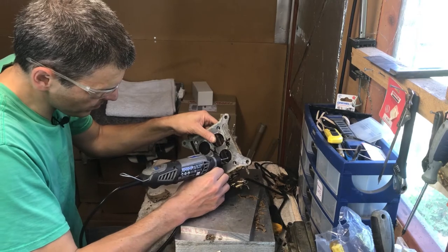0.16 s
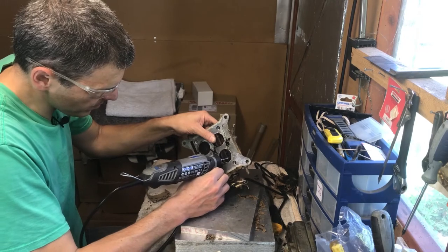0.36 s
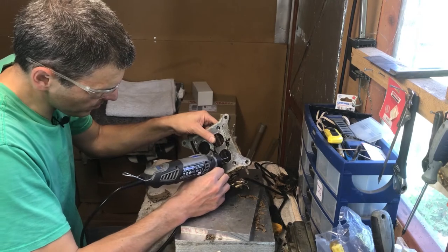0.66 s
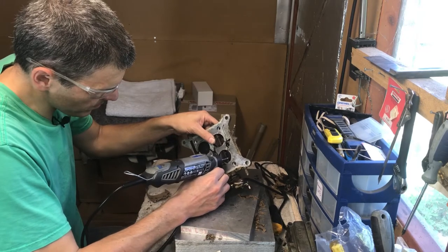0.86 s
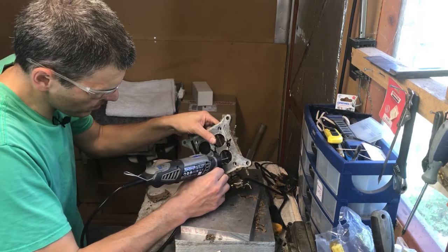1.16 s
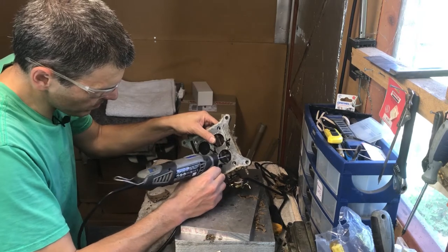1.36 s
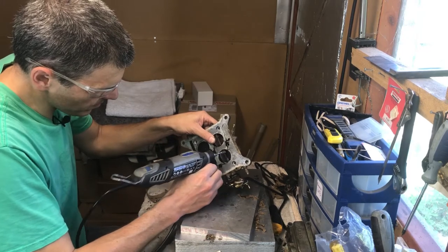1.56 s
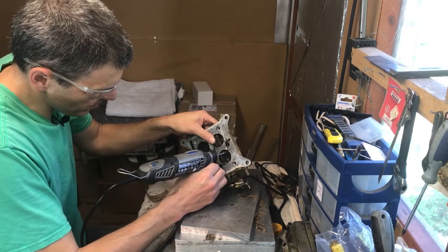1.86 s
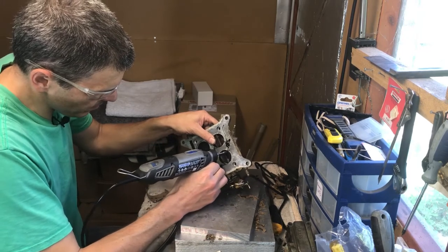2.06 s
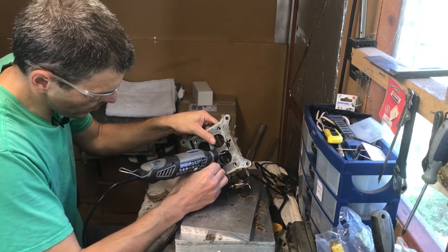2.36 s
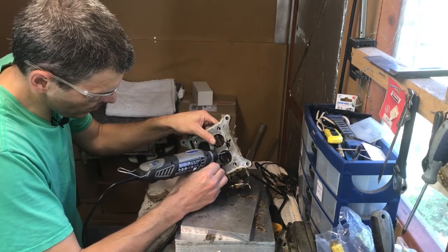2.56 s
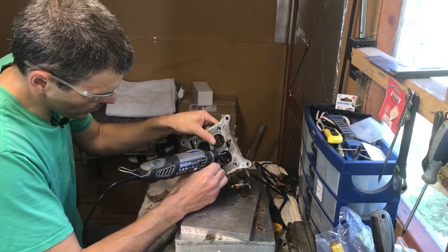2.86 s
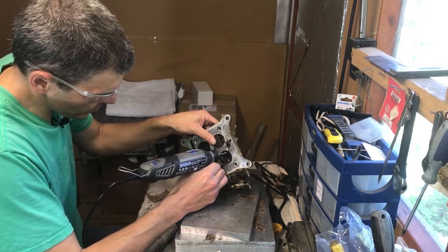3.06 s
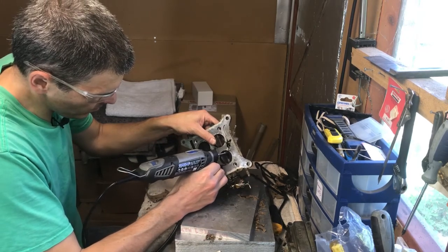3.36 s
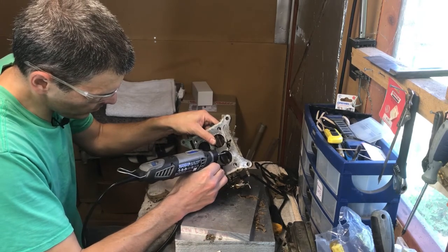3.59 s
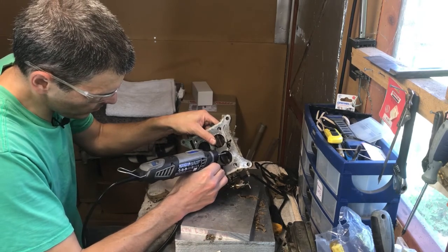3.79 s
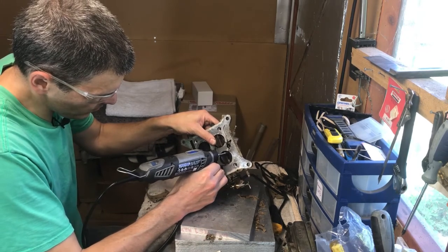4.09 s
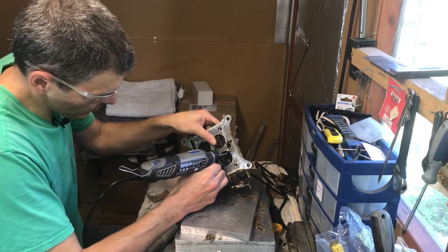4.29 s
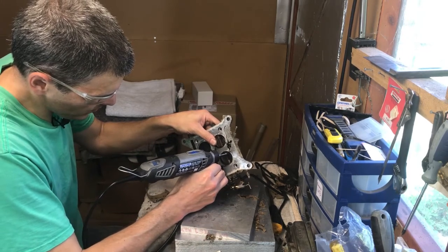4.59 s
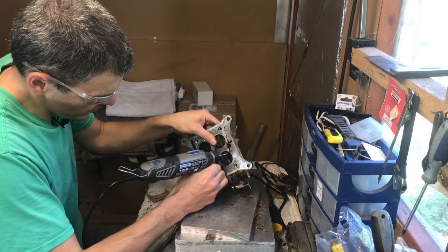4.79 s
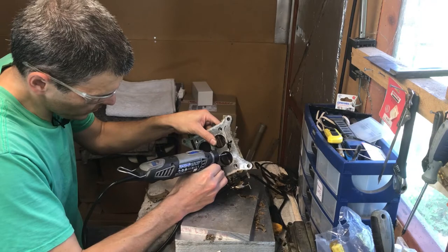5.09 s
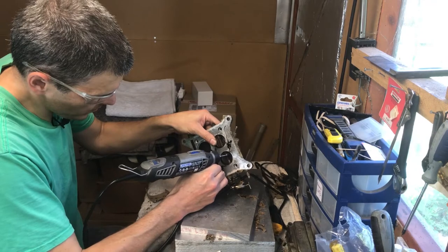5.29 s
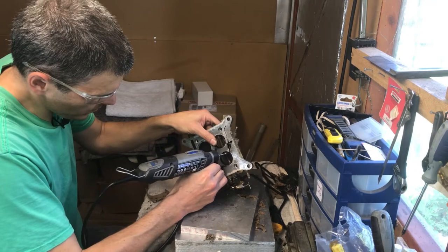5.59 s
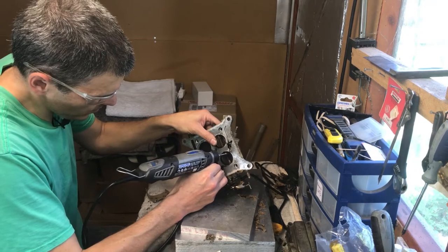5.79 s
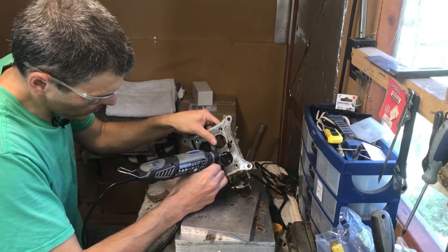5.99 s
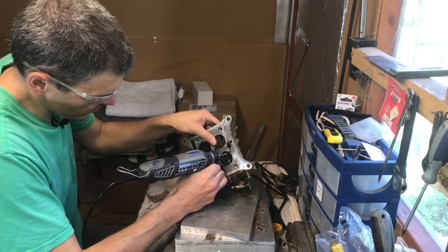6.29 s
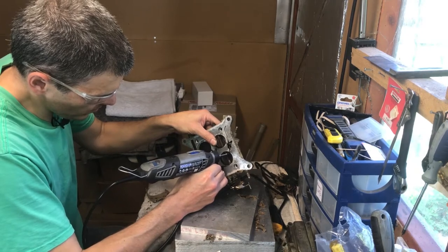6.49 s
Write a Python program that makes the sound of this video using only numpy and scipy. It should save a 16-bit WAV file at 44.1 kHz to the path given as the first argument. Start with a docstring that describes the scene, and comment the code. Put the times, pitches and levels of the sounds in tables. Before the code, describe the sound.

A corded rotary tool whines at high speed while its cutting tip grinds a metal part in short, rasping strokes.

```python
"""A corded rotary tool grinds a cast metal housing on a workbench, heard in mono from close by.
From the start its motor whines at about 23,000 rpm over a rush of cooling air. Each stroke slows it,
and the burr (the cutting tip) bounces some sixty times a second, tearing off grit that rings the metal.
Just after 1 s the burr is lifted and the motor recovers. From 2 s it sweeps to and fro on a new spot,
about four strokes a second and ever harder. Around 5 s the hand leans in and the bench thuds more."""
import sys
import numpy as np
from scipy import signal
from scipy.fft import rfft, irfft
from scipy.io import wavfile
from scipy.ndimage import uniform_filter1d

SR = 44100
rng = np.random.default_rng(int(sys.argv[2]) if len(sys.argv) > 2 else 0)


def file_out(sig):
    """Save sig as 16-bit WAV at sys.argv[1]."""
    # one column per channel
    cols = np.atleast_2d(sig).T
    # limit, then scale
    lim = np.clip(cols, -1, 1)
    pcm = np.round(lim * 32767).astype(np.int16)
    wavfile.write(sys.argv[1], SR, pcm)


N = 293265
TIME = np.arange(N) / SR
FREQ = np.arange(N // 2 + 1) * SR / N

# The three main motor tones as the tool is tilted: time_s, fan_db, octave_below_whine_db, whine_db
MOTOR_LEVELS = [(0, -36, -46, -39), (1.0, -39.5, -38, -31), (1.2, -40, -59, -31), (1.42, -36, -53, -26.5),
                (1.6, -35, -43, -34.5), (1.72, -58, -36, -32.5), (1.95, -50, -40, -31),
                (2.2, -35, -43.5, -30), (4.7, -43, -41, -30), (5.35, -34.5, -51, -30.5),
                (5.8, -48, -33.5, -25), (6.65, -39, -55, -35)]
# Weaker overtones of the spinning shaft: times_shaft_speed, level_db
SHAFT_OVERTONES = [(5, -47.5), (7, -49.5), (9, -79), (15, -43), (16, -38), (23, -36), (25, -38.5),
                   (36, -58)]
# Bearing tones, which lie between the overtones: times_shaft_speed
BEARING_TONES = [4.083, 5.083, 9.17]
# Tone colour of the cooling air and the motor's brushes: pitch_hz, level_db
AIR_COLOUR = [(110, -19.5), (520, -18.5), (620, -6), (950, -5), (1150, -8), (1500, -6), (3000, 0),
              (6000, 0), (8000, 0.5), (9700, 0.5), (10400, -6.5), (11300, 0.5), (13000, -1), (15700, -1.5)]
# Tone colour of the workshop's rumble: pitch_hz, level_db
RUMBLE_COLOUR = [(20, -4), (48, -8), (75, 7.5), (120, -9.5), (170, -1.5), (400, -21), (900, -66)]
# Strokes of the burr: middle_s, length_s, level_db, shaft_drag_hz, bounce_rate_hz, bounce_depth_0_to_1
BURR_STROKES = [(0.024, 0.2, -22, 18.5, 62.4, .6), (0.282, .24, -21, 10.2, 47.6, 0.67),
                (0.494, 0.18, -20.5, 11, 48.6, .8), (0.817, .21, -28.5, 6.7, 55, 0.9),
                (1.003, 0.1703, -23.5, 1.53, 57, 0.99), (1.131, .17, -55, 5.4, 48.4, .8),
                (1.982, 0.075, -27.5, 1.09, 57.8, 0.26), (2.125, 0.21, -22, 8, 57.9, 0.24),
                (2.28, .14, -26.5, 3.8, 53.3, 0.62), (2.604, .21, -21.5, 8.4, 69.98, 0.4),
                (2.901, .33, -21.5, 10, 56, 0.7), (3.237, 0.28, -21.5, 9.7, 53.05, 0.67),
                (3.594, .29, -21, 10.3, 62.24, 0.48), (3.873, .24, -19.5, 12.8, 64, 0.54),
                (4.145, .28, -20, 10.8, 55.1, 0.4), (4.397, .29, -18, 19.6, 57.93, 0.51),
                (4.701, 0.25, -18, 14.5, 55.1, 0.54), (4.955, .18, -19, 19, 70.1, 0.53),
                (5.199, .24, -18.5, 19, 76.23, 0.81), (5.441, .2, -20.5, 25, 60, 0.34),
                (5.66, .14, -16.5, 4.7, 67.8, .6), (5.863, 0.25, -19, 14.4, 55.84, 0.46),
                (6.109, .17, -18, 17.6, 57, 0.45), (6.354, 0.21, -18.5, 18.9, 59.97, .55),
                (6.602, .13, -19, 16.6, 51.96, 0.37)]
# Tone colour of the bare scrape: pitch_hz, first_spot_db, second_spot_db
SCRAPE_COLOUR = [(230, -25, -32.5), (535, -24.5, -29.5), (590, -16.5, -22.5), (1280, -14.5, -16),
                 (2340, -3.5, -5), (3350, -9.5, -5.5), (5670, -1, -3.5), (8800, -3, -2),
                 (10500, -10.5, -10), (11330, -1.5, -4), (13400, -13, -17), (16050, -12, -1.5)]
# Ringing notes of the metal, relative to the scrape: pitch_hz, half_width_hz, first_spot_db, second_spot_db
METAL_NOTES = [(304.6, 21, 18.5, 22), (420, 43, 10, 16), (601, 11, 9, 9.5), (994, 40, 16.5, 19),
               (1128, 22, 12, 15), (1486, 58, 11.5, 7.5), (2187, 17, 4, 7), (2370, 55, 5, 7.5),
               (2586, 48, 6.5, 9), (3145, 33, 9.5, -4), (4375, 8.9, 4, 17), (4580, 13, 16.5, -6),
               (4830, 68, 2, 3), (5185, 118, 9, 8), (5287, 91, -6, 10.5), (5443, 38, 0, 11.5),
               (5670, 29, 2, 10.5), (5980, 53, 6, 9.5), (6290, 66, 3, 5.5), (7066, 102, -16, 10.5),
               (7970, 35, -1, 8), (8376, 45, 9, 7.5), (8570, 73, 11.5, -12), (9130, 20, 2, 16),
               (12070, 60.3, -7, 12), (13400, 110, 11, -2), (14280, 47, 1, 12.5), (14750, 83, -4, 12)]
# Brief dips in the hiss, while the main tones carry on: middle_s, length_s, depth_db
HISS_DIPS = [(0.052, 0.012, -5), (.136, .014, -2.5), (0.748, 0.032, -29), (0.904, 0.014, -4),
             (1.244, 0.008, -11), (1.938, 0.028, -37), (2.271, 0.014, -25), (2.436, 0.016, -27),
             (3.381, 0.016, -27), (3.869, 0.016, -34), (4.319, 0.024, -9), (4.509, 0.015, -18),
             (4.766, 0.014, -14.5), (5.171, 0.014, -20), (5.676, 0.036, -21), (5.814, .011, -32),
             (5.92, 0.014, -3)]
# Moments when the burr catches hard on the metal: time_s, relative_peak_db
HARD_CATCHES = [(0.2363, 0), (0.2588, -2), (0.2942, -1), (0.3147, 2.5), (0.3403, 2), (0.4308, 0.5),
                (0.452, -1.5), (0.4735, 2), (0.493, -2), (0.512, 1), (0.6478, -5), (2.8785, 0),
                (2.8963, 1.5), (3.2651, 1), (4.2752, 0), (4.354, 2.5), (4.9186, 2.5), (4.9341, 4.5),
                (4.9626, 1), (5.1399, 1.5), (5.1952, 2.5), (5.6098, 1.5), (5.7152, 1), (5.7884, -1)]

FREE_SHAFT_HZ, MAINS_HZ = 391, 50  # shaft turns a second with no load; the power supply
FULL_LOAD_DB = -21.5  # an ordinary stroke, which counts as load 1
SPOT_CHANGE_S = 1.5
LEAN_MIDDLE_S, LEAN_LENGTH_S = 5.22, 1  # the hand leans harder on the metal
TOP_HZ = 15750  # treble limit


def undb(db):
    """Turn decibels into a gain."""
    return 10 ** (np.asarray(db) / 20)


def unit(x):
    """Scale a signal to an average (rms) level of 1."""
    return x / np.sqrt(np.mean(x ** 2))


def spectra(table):
    """Turn each level column of a tone colour table into a gain for every frequency."""
    hz, *columns = np.transpose(table)
    return [undb(np.interp(np.log(FREQ + 1), np.log(hz), db)) for db in columns]


def colour(x, gain):
    """Filter a sound by the given gains so that peaks ring after a blow, never before it."""
    cepstrum = irfft(np.log(gain + 1e-9), N)
    cepstrum[1:N // 2] *= 2
    cepstrum[N // 2:] = 0
    return irfft(rfft(x) * np.exp(rfft(cepstrum)), N)


def wander(rate_hz):
    """A smooth random curve of size about 1 that changes about rate_hz times a second."""
    hold = max(int(SR / rate_hz), 2)
    steps = np.repeat(rng.standard_normal(N // hold + 1), hold)
    return unit(uniform_filter1d(uniform_filter1d(steps, hold), hold)[:N])


def ripple(spacing_hz, depth_db):
    """Small peaks and notches in tone colour, from crowded weak resonances and nearby surfaces."""
    heights = rng.standard_normal(4096)
    return undb(depth_db * np.interp(FREQ / spacing_hz, np.arange(len(heights)), heights))


def resonance(hz, half_width_hz):
    """Power gain of two resonances close together: one peak with steep sides."""
    return 1 / (1 + ((FREQ - hz) / half_width_hz) ** 2) ** 2


def push(middle_s, length_s):
    """A smooth push of the hand: 1 at its middle, 0 well outside its length."""
    return np.exp(-np.abs(2 * (TIME - middle_s) / length_s) ** 2.9)


def tone(turns, db, waver_db, smear):
    """One tone whose level and phase (smear, in radians) waver as the hands move the tool."""
    level = undb(db + waver_db * wander(9))
    return np.sqrt(2) * level * np.sin(2 * np.pi * turns + smear * wander(45))


def motor(load, slowdown_hz):
    """The shaft hums, its 8-blade fan sings and its 24 turning contacts (the commutator) whine."""
    wobble = (0.000487 + 0.001212 * load) * wander(16)
    shaft = np.cumsum((FREE_SHAFT_HZ - slowdown_hz) * (1 + wobble)) / SR  # turns so far
    fan, commutator, mains_pulses = 8 * shaft, 24 * shaft, 2 * MAINS_HZ * TIME
    time_s, *levels = np.transpose(MOTOR_LEVELS)
    fan_db, octave_below_db, whine_db = [np.interp(TIME, time_s, db) for db in levels]
    # the hum fades as the motor slows and as the hand leans in
    hum_db = -45.5 - 0.45 * slowdown_hz - 3.5 * push(LEAN_MIDDLE_S, LEAN_LENGTH_S)
    main = tone(shaft, hum_db, waver_db=1.95, smear=0.068)
    main += tone(fan, fan_db, waver_db=1.5, smear=0.073)
    # the biting burr jolts the shaft, which roughens the highest tones
    main += tone(commutator / 2, octave_below_db, waver_db=1.5, smear=0.2 + 0.5 * load)
    main += tone(commutator, whine_db - 2 * load, waver_db=2, smear=0.4 + 0.9 * load)
    weak = 0
    for multiple, db in SHAFT_OVERTONES:
        weak += tone(multiple * shaft, db, waver_db=2, smear=0.4 + 0.5 * load)
    for multiple in BEARING_TONES:
        weak += tone(multiple * shaft, db=-52, waver_db=2, smear=0.15)
    # the mains drives the motor in pulses, adding a row of tones below the fan's
    for step, db in enumerate([-45, -44, -44], start=1):
        main += tone(fan - step * mains_pulses, db, waver_db=2.5, smear=0.5)
    coil_hum = tone(2 * mains_pulses, db=-60.5, waver_db=2.1, smear=0.05)
    return main, weak + coil_hum


def cooling_air():
    """Air rushes evenly through the vents, with a hollow note from the work corner."""
    hollow = np.sqrt(1 + undb(12) ** 2 * resonance(hz=288.6, half_width_hz=14))
    gain = spectra(AIR_COLOUR)[0] * hollow * ripple(spacing_hz=71.8, depth_db=0.5)
    return undb(-25 + 0.25 * wander(5)) * unit(colour(rng.standard_normal(N), gain))


def workshop_rumble():
    """The room rumbles, low and faint."""
    rumble = colour(rng.standard_normal(N), spectra(RUMBLE_COLOUR)[0])
    return undb(-60 + 2 * wander(6)) * unit(rumble)


def strokes():
    """Each stroke makes the burr bite and bounce, and drags down the motor, whose speed follows late."""
    middle_s, length_s, db, drag_hz, bounce_hz, depth = np.transpose(BURR_STROKES)
    pushes = push(middle_s[:, None], length_s[:, None])
    lag_s, start_slowdown_hz = 0.154, 8.4
    memory = np.exp(-1 / (lag_s * SR))
    slowdown_hz = signal.lfilter([1 - memory], [1, -memory], drag_hz @ pushes)
    slowdown_hz += start_slowdown_hz * np.exp(-TIME / lag_s)
    bite = np.hypot(undb(db) @ pushes, undb(-40))  # a faint rub remains between strokes
    return bite, slowdown_hz, np.interp(TIME, middle_s, bounce_hz), np.interp(TIME, middle_s, depth)


def burr_force(bite, bounce_hz, depth):
    """The burr presses on the metal with steady rubbing, uneven bounces and a few hard catches."""
    cycle = np.cumsum(bounce_hz * (1 + 0.046 * wander(30))) / SR
    size_db = 1.07 * np.clip(rng.standard_normal(1024), -2, 2)
    shape = np.sin(np.pi * (cycle % 1) ** 0.72) ** 1.84  # digs in quickly, lets go more slowly
    catches, thrown_clear = hard_catches()
    bounces = unit(undb(size_db)[cycle.astype(int)] * shape) * (1 - thrown_clear)
    return np.hypot(bite * unit(1 - depth + depth * bounces), catches)


def knocks(force):
    """Sharpen the peaks of the force but keep its power: these blows set the metal ringing."""
    peaks = force ** 2.4
    power, peak_power = (uniform_filter1d(x ** 2, size=900) for x in (force, peaks))
    return peaks * np.sqrt(np.abs(power) / (np.abs(peak_power) + 1e-18))


def grit(spread_db):
    """A dense spray of chips of uneven size, each a tiny burst of noise."""
    chips = np.repeat(rng.standard_normal(N // 8 + 1), 8)[:N]
    return unit(rng.standard_normal(N) * undb(spread_db * np.clip(chips, -2.5, 2.5)))


def grinding(force):
    """Chips scrape the metal and make it ring; each of the two spots favours its own notes."""
    hz, half_width_hz, *note_db = np.transpose(METAL_NOTES)
    peaks = resonance(hz[:, None], half_width_hz[:, None])
    coarse, fine = ripple(spacing_hz=29.96, depth_db=3.5), ripple(spacing_hz=18, depth_db=2.28)
    blows = knocks(force)
    spots = [TIME < SPOT_CHANGE_S, TIME >= SPOT_CHANGE_S]
    scrape, ring = 0, 0
    for on_spot, bare_scrape, db in zip(spots, spectra(SCRAPE_COLOUR), note_db):
        # notes above about 9.5 dB ring at every bounce; weaker ones only colour the scrape
        strong = 1 / (1 + np.exp(2 * (9.5 - db)))
        power = undb(db) ** 2
        rubbing = bare_scrape * coarse * np.sqrt(1 + (power * (1 - strong)) @ peaks)
        ringing = bare_scrape * fine * np.sqrt((power * strong) @ peaks)
        total = np.sqrt(np.mean(rubbing ** 2 + ringing ** 2, where=FREQ < TOP_HZ) * 2 * TOP_HZ / SR)
        scrape += colour(on_spot * force * grit(spread_db=3.5), rubbing / total)
        ring += colour(on_spot * blows * grit(spread_db=0.5), ringing / total)
    return undb(1) * scrape, undb(2) * ring


def burr_drift(scrape, below_hz, swing_db):
    """As the burr drifts over the metal, the low part of the scrape swells and fades."""
    low = signal.sosfilt(signal.butter(1, below_hz, fs=SR, output="sos"), scrape)
    return scrape + low * (undb(swing_db * wander(11)) - 1)


def bench_thud(force):
    """The bounces thud faintly through the bench, louder while the hand leans in."""
    bass_band = signal.butter(1, [55, 110], "band", fs=SR, output="sos")
    thud = signal.sosfilt(bass_band, force * (1 + 0.5 * wander(110)))
    return undb(-64.5 + 12 * push(LEAN_MIDDLE_S, LEAN_LENGTH_S)) * unit(thud)


def hiss_dips():
    """The hiss drops away for an instant now and then: a gain of 1 with short, steep dips."""
    return undb(sum(db * np.exp(-(2 * (TIME - middle_s) / length_s) ** 4)
                    for middle_s, length_s, db in HISS_DIPS))


def hard_catches():
    """The burr snags with a sharp jolt and is thrown clear, skipping its ordinary bounce."""
    rise_s = 0.0029
    jolts, thrown_clear = np.zeros(N), np.zeros(N)
    for time_s, db in HARD_CATCHES:
        age = np.maximum(TIME - time_s + 0.0016, 0) / rise_s
        jolts += undb(db - 14.5) * age * np.exp(1 - age)
        thrown_clear = np.maximum(thrown_clear, np.abs(TIME - time_s - rise_s) < 0.012)
    return jolts, uniform_filter1d(thrown_clear, size=128)


def scene():
    """The strokes load the motor and drive the grinding; both ears hear the same."""
    bite, slowdown_hz, bounce_hz, depth = strokes()
    force = burr_force(bite, bounce_hz, depth)
    scrape, ring = grinding(force)
    main_tones, weak_tones = motor(bite / undb(FULL_LOAD_DB), slowdown_hz)
    scrape = burr_drift(scrape, below_hz=1700, swing_db=4)
    thud = bench_thud(force / np.sqrt(bite))  # grows more slowly than the bite
    noise = scrape + thud + workshop_rumble() + cooling_air()
    dips = hiss_dips()  # the weak tones and the ring dip less than the noise
    mono = main_tones + weak_tones * dips ** 0.39 + ring * dips ** 0.15 + noise * dips
    return np.array([mono, mono])


def record(dry):
    """The hardest peaks are softly rounded off, and the highest treble is cut steeply."""
    rounded = dry / (1 + (dry / 0.85) ** 6) ** (1 / 6)
    return irfft(rfft(rounded) / np.sqrt(1 + (FREQ / TOP_HZ) ** 600), N)


dry = scene()
out = record(dry)
file_out(out)
```